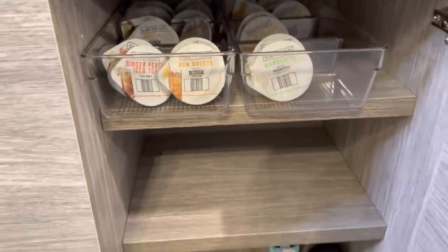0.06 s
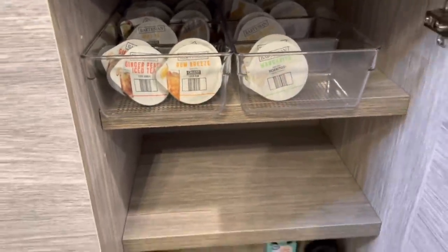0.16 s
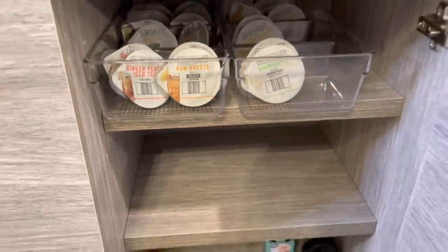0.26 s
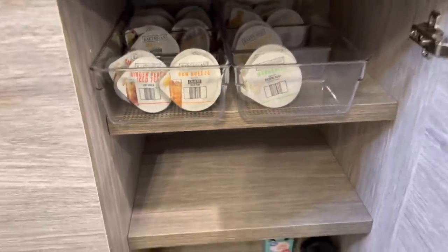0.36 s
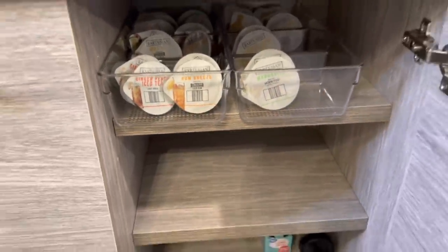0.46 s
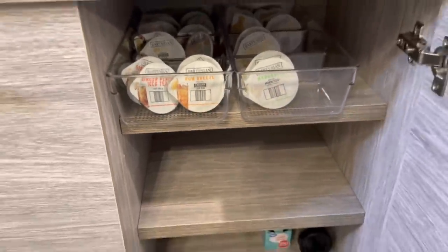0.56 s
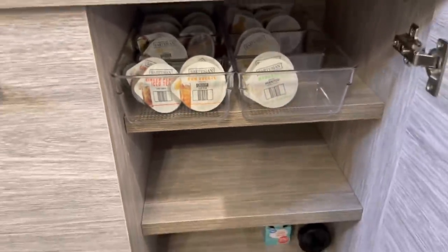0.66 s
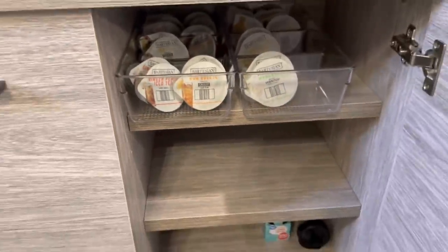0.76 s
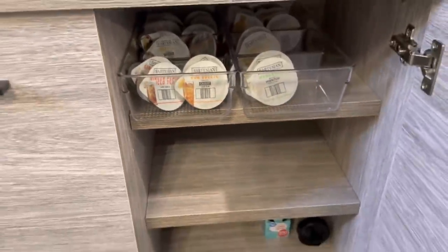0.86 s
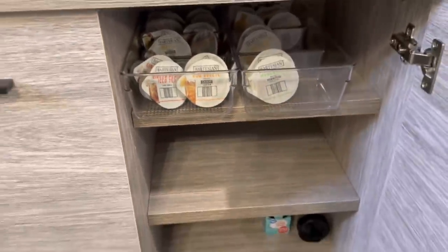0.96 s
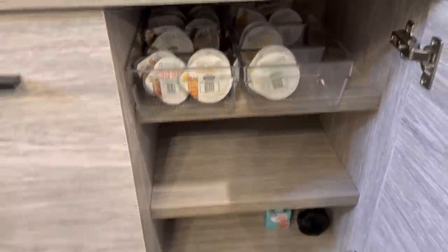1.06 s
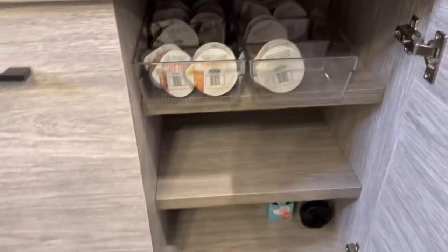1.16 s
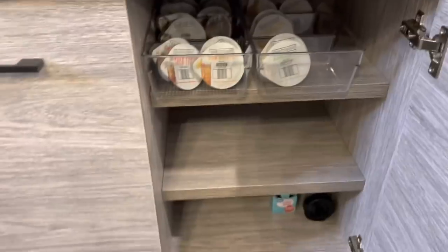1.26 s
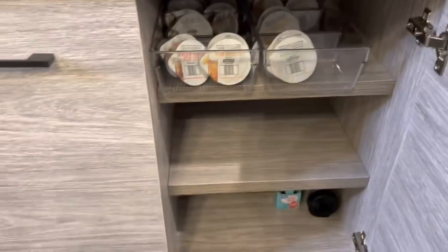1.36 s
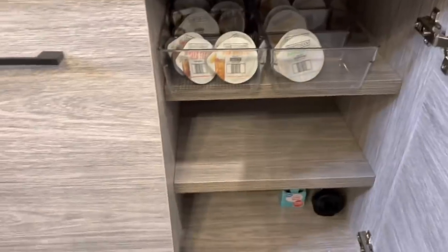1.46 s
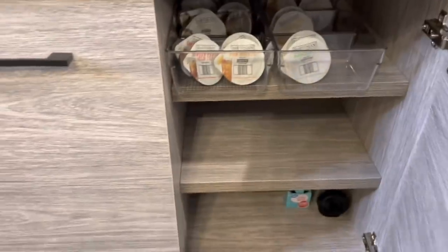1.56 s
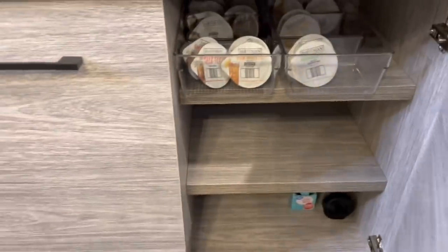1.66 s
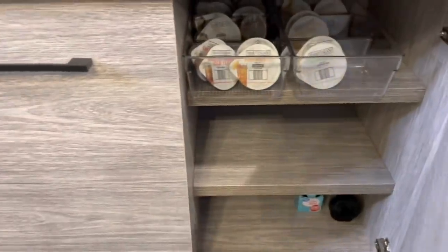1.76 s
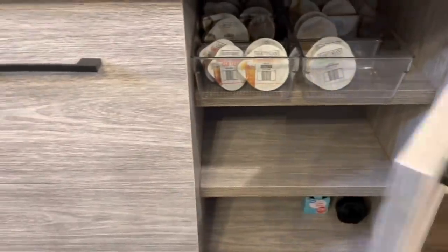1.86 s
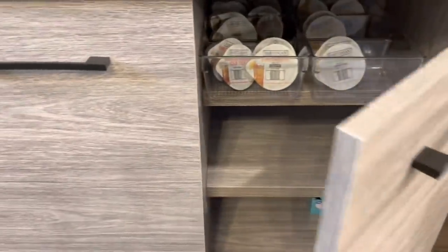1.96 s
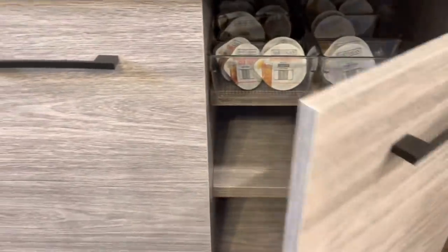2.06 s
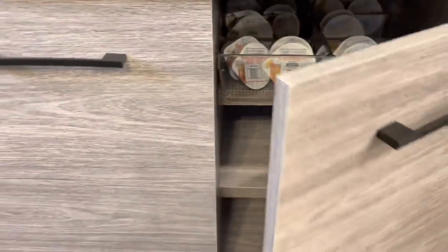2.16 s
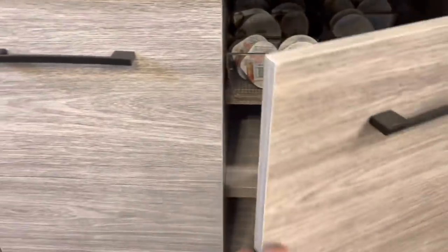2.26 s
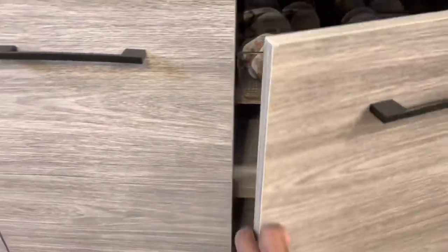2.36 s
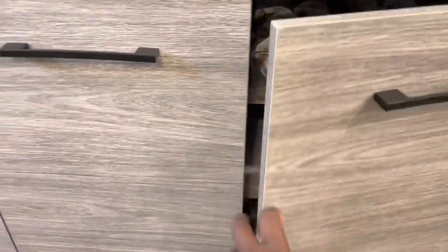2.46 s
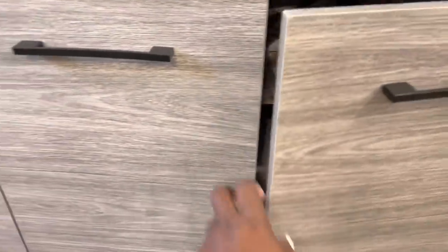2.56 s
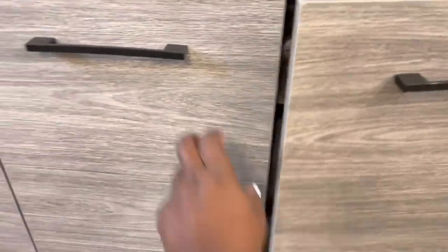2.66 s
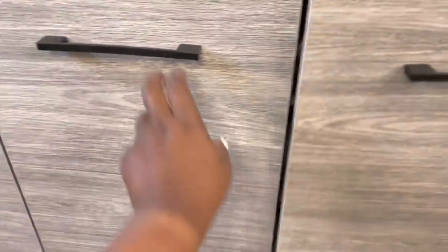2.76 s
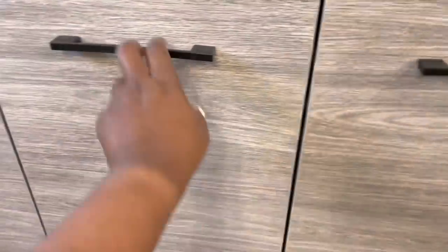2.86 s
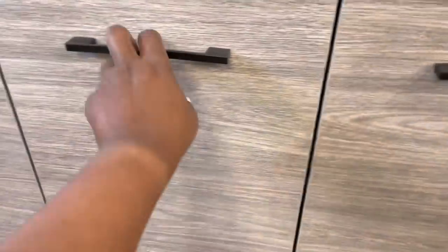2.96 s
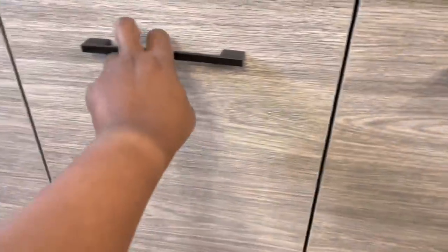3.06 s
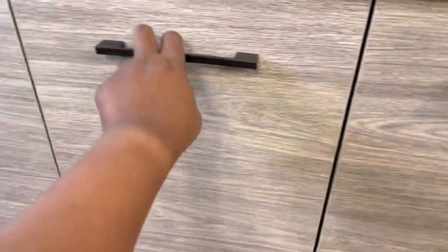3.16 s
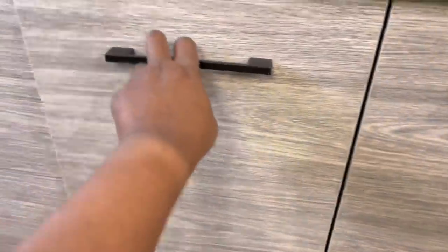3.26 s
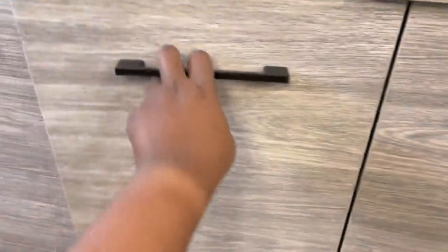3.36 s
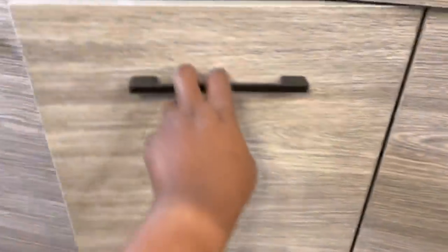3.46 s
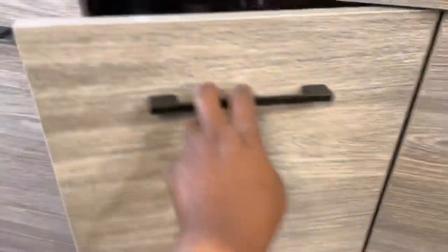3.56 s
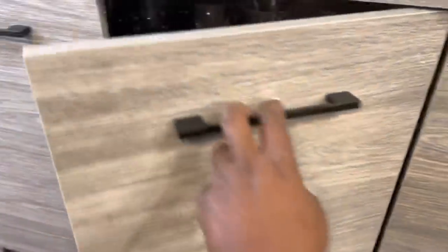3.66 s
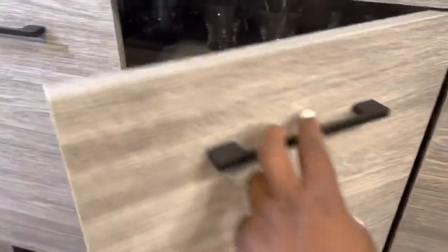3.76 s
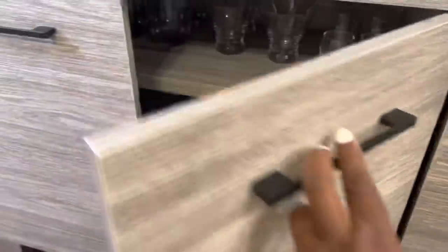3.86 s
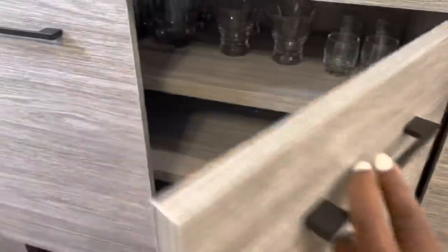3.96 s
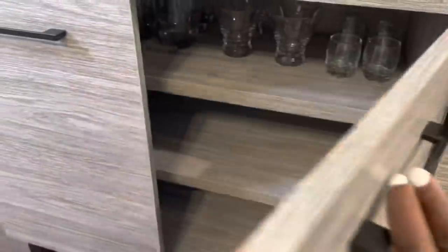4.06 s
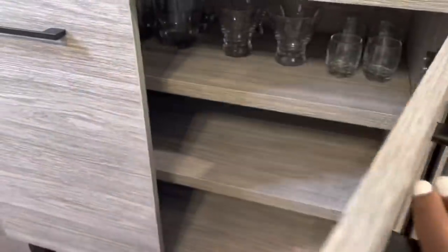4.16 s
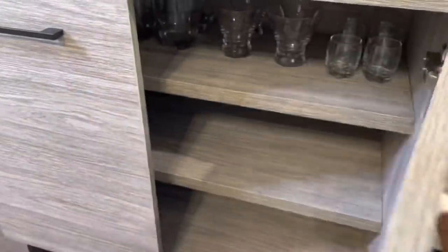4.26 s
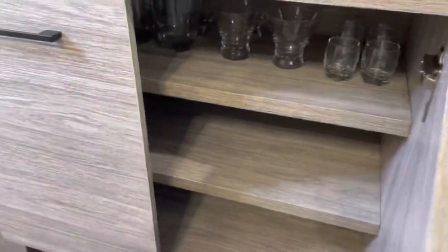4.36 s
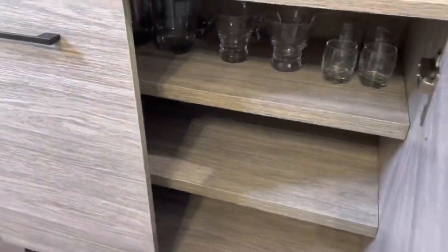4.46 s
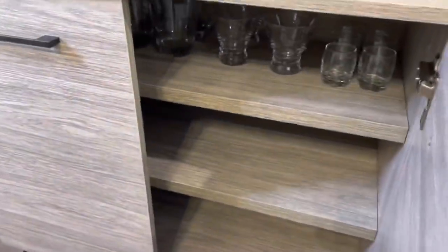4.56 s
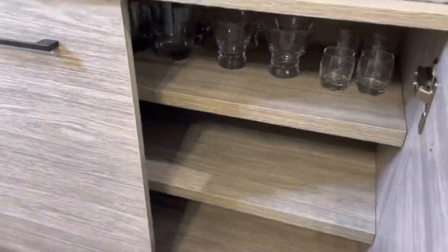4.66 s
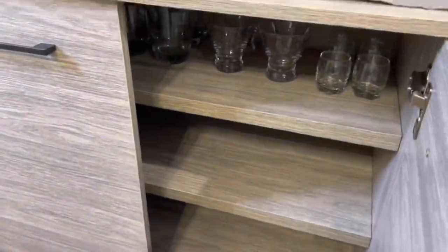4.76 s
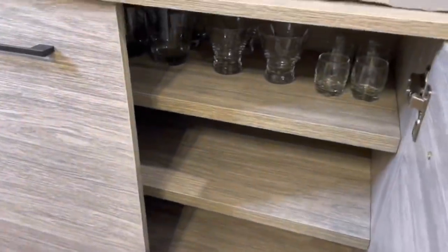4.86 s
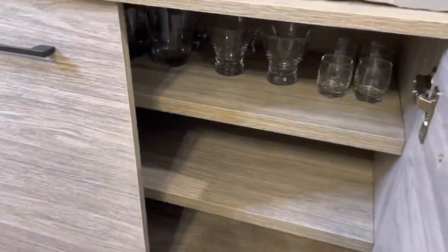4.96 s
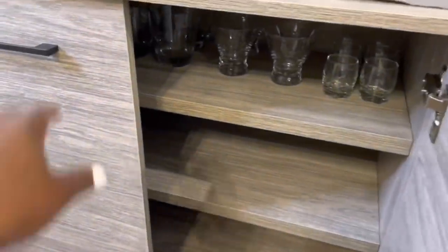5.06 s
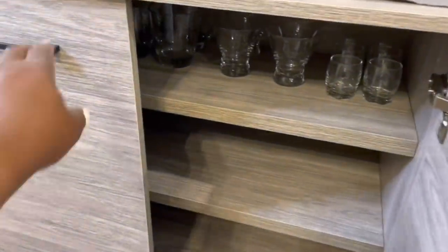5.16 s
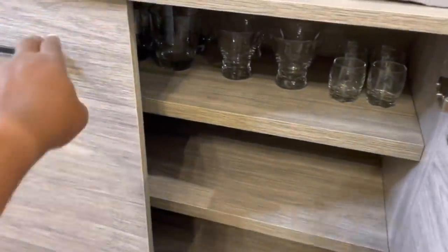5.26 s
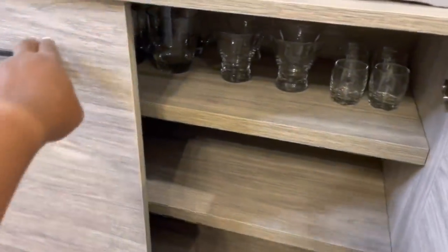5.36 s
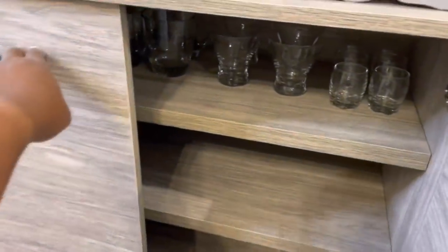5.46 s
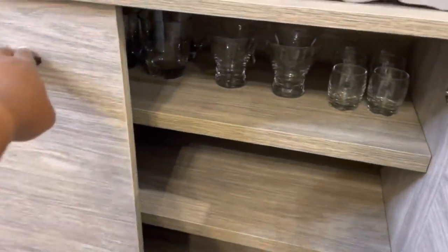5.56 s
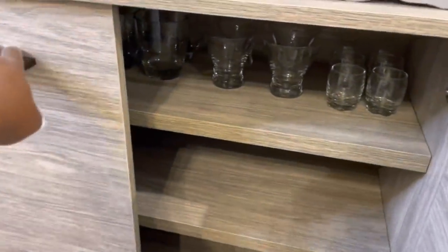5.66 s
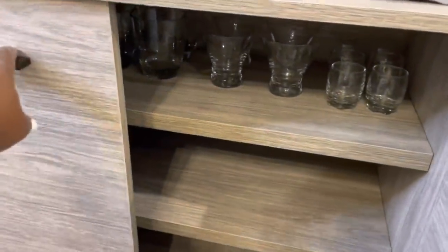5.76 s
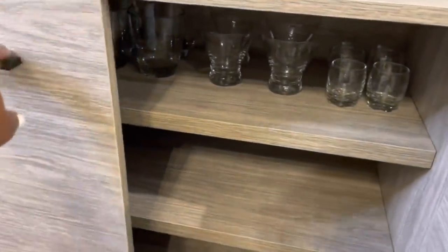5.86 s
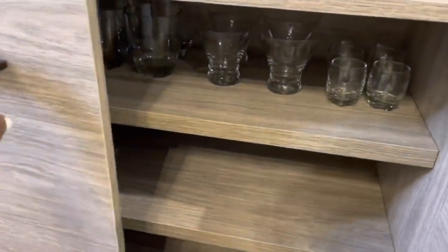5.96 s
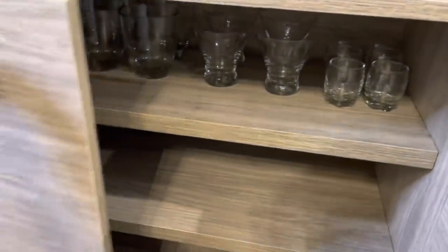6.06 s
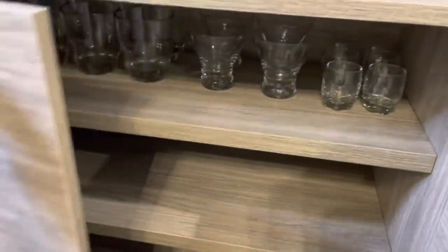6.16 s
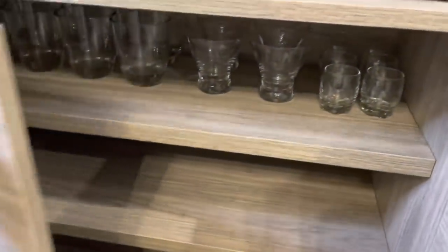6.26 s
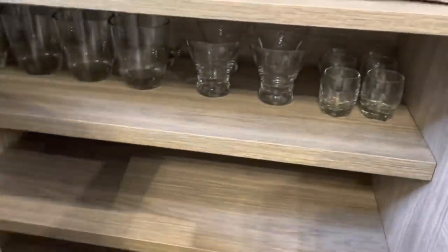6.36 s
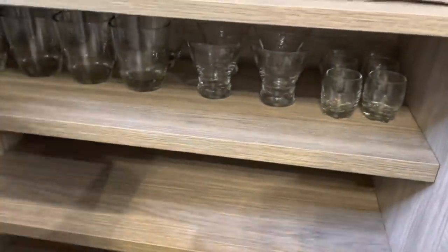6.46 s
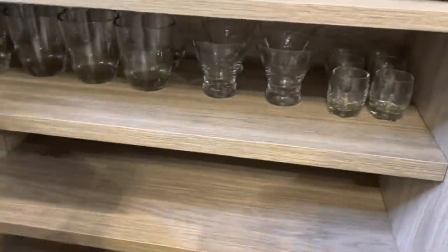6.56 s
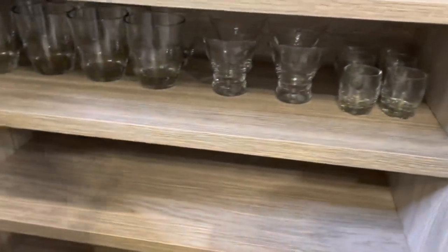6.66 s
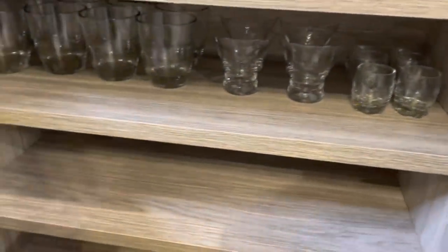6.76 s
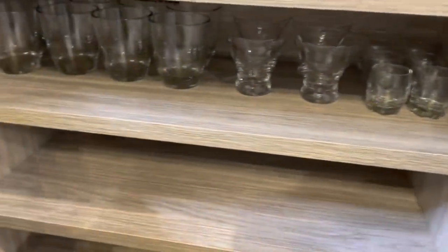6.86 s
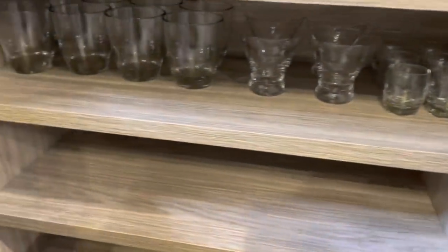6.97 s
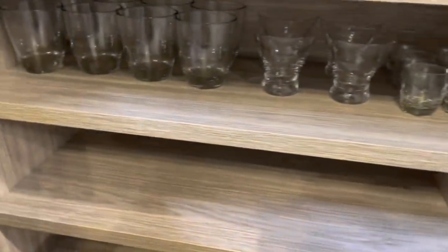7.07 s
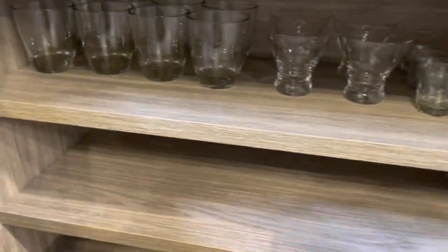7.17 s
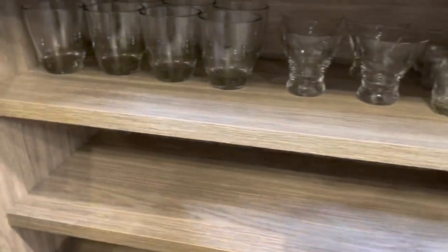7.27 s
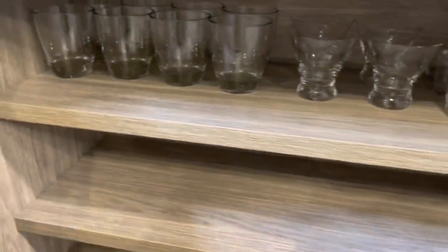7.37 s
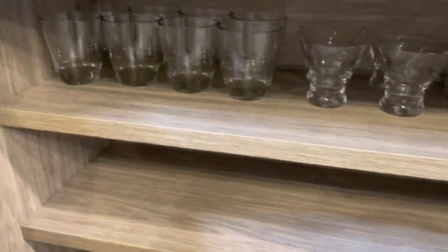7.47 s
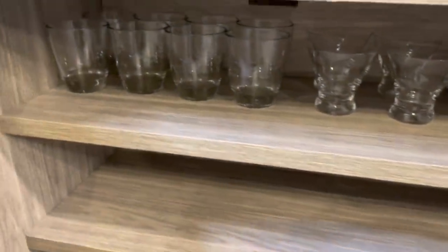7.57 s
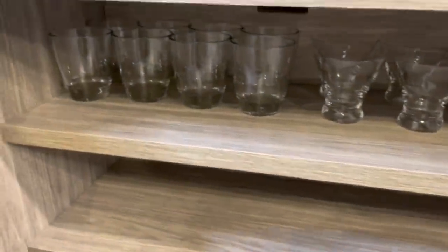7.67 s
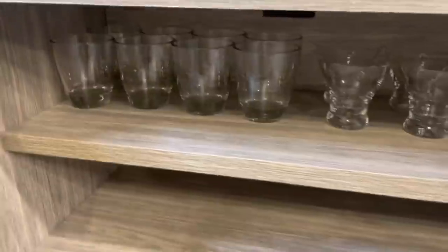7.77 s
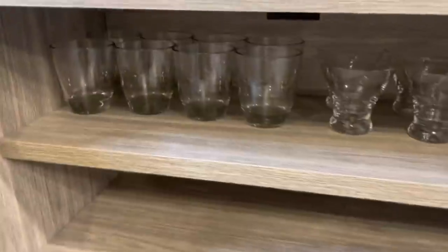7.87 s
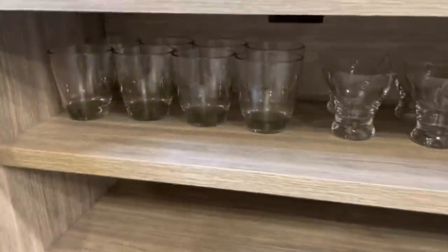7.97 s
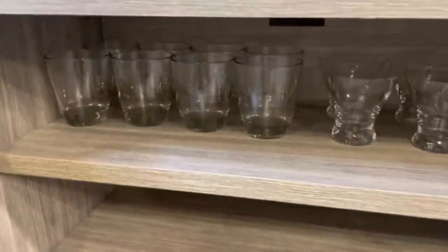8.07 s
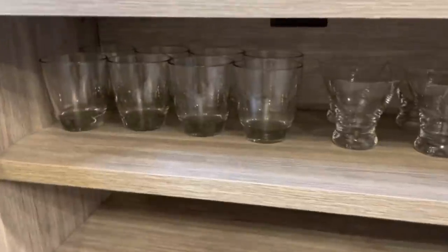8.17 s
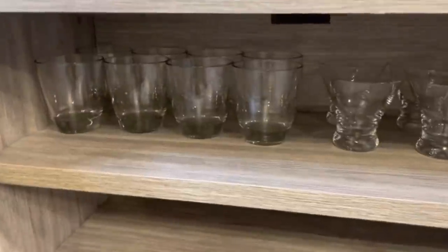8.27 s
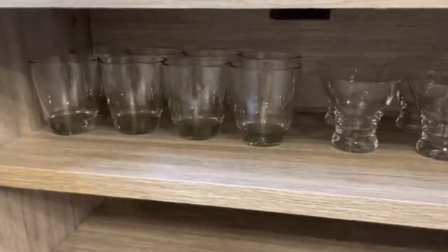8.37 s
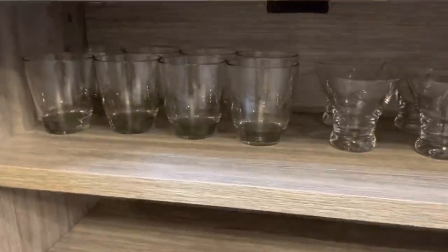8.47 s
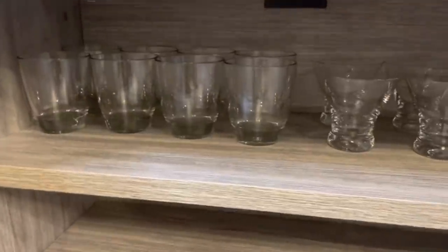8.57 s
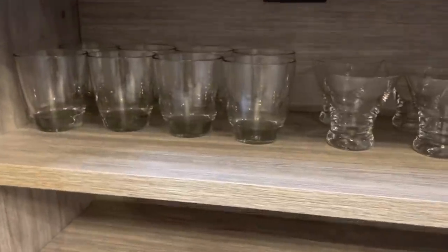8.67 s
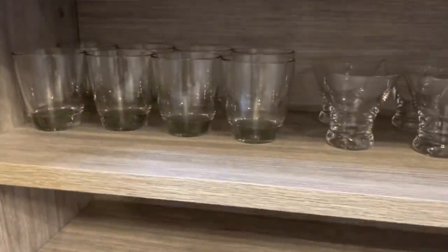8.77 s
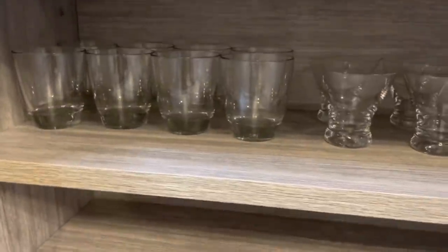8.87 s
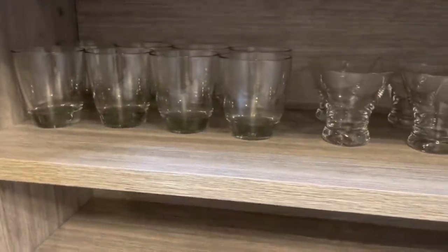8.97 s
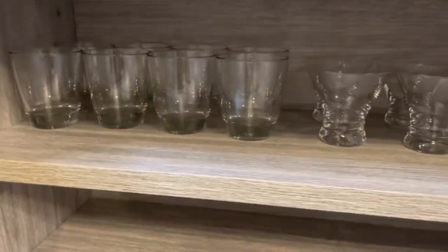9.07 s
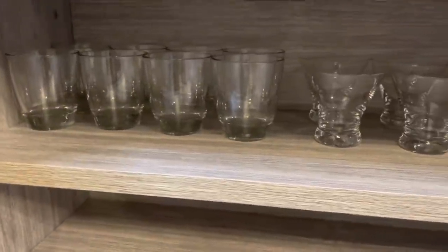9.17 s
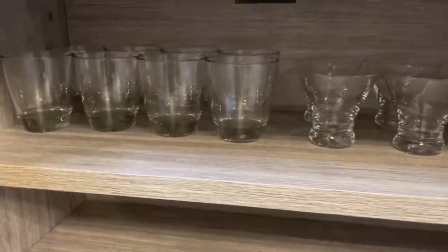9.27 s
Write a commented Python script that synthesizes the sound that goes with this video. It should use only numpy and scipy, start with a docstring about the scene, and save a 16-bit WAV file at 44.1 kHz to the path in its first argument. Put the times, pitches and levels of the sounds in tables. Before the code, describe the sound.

One loud, booming slam of a wooden cupboard door in a quiet kitchen, followed by soft handle taps, a scrape and dull thuds.

```python
"""A quiet kitchen: two appliance motors hum over the room tone, and a wooden cabinet door slams. The blow rings
its panels and carcass, the squeezed air booms inside, and the hard walls give every knock a long tail. A hand
taps handles and swings a door open with a faint squeak of hinge friction that ends in a short click. Cloth and
skin rustle; slippers scuff and thud on the floor."""
import sys
import numpy as np
from scipy import signal
from scipy.fft import rfft, irfft, next_fast_len
from scipy.io import wavfile
from scipy.ndimage import uniform_filter1d

SR = 44100
rng = np.random.default_rng(int(sys.argv[2]) if len(sys.argv) > 2 else 0)


def generate_wav(signal):
    """Clip the signal to [-1, 1] and save it as 16-bit WAV at the path in sys.argv[1]."""
    frames = np.transpose(np.atleast_2d(signal))
    scaled = np.clip(frames, -1, 1) * 32767
    pcm = np.round(scaled).astype(np.int16)
    wavfile.write(sys.argv[1], SR, pcm)


N = 410438

# stereo image of the room and of close sources: f/Hz, left-right correlation
ROOM_IMAGE = [(60, 0.96), (130, 0.91), (290, .75), (640, 0.2), (1400, -0.33), (3100, .25), (7000, -.1),
              (9000, 0.12), (11000, 0.6), (15000, .8)]
CLOSE_IMAGE = [(60, 0.98), (200, .94), (380, .8), (700, 0.099), (1300, .3), (2400, .2), (4400, 0.12),
               (8000, -.5), (10500, -0.24), (15000, .85)]
# spectrum of the room tone: f/Hz, relative level/dB
ROOM_SPECTRUM = [(20, -13.5), (32, -5.5), (70, 0), (100, -12.5), (160, -9.5), (300, -11), (500, -17.5),
                 (900, -31), (1600, -42), (2600, -50), (6500, -53), (8800, -49.5), (12000, -60),
                 (15500, -63)]
# two motors and mains buzz: f/Hz, start level/dB, end level/dB, pan/dB, waver/dB
HUM_PARTIALS = [(54.7, -66, -68, -4.5, 6.5), (112, -57, -52, 2.5, 1.5), (171, -70, -75.5, 2, -5),
                (226.15, -63.5, -70, 6.5, 3.5), (279, -68.5, -75, 6.5, -3), (335, -66, -73.5, -6.5, 2),
                (57, -59, -55, 2.5, 2.5), (117.1, -64.5, -57, -0.5, 2), (186.4, -68, -72, -1.5, 2.5),
                (347, -72, -76.5, 0.5, -5.5), (70, -59, -60.5, 2, 1), (42.6, -73, -71.5, -0.5, -0.5),
                (120, -71, -59, -0.5, 4), (117, -71.5, -69, 6, 0.5), (350, -77, -67, 5.5, 4)]
# three colours of friction (mid rub, airy sheen, low body): f/Hz, relative level/dB
RUB_SPECTRUM = [(1500, -2.5), (2600, -0.5), (3300, -4.5), (4300, -3.5), (5400, -12.5), (6500, -11),
                (7800, -15.5), (9000, -32)]
SHEEN_SPECTRUM = [(7500, -30), (9500, -4), (11500, -0.5), (14000, -2.5), (15600, -4.5)]
BODY_SPECTRUM = [(300, -19), (600, -0.5), (1100, -6.5), (1600, -13), (2200, -36)]
# narrow resonances on rub and body: f/Hz, width/Hz, boost/dB
RUB_PEAKS = [(1000, 55, 6), (1190, 100, 7.5), (1610, 50, 3.5), (1750, 50, 7), (2080, 80, 7),
             (2600, 100, 5.5), (2850, 32, 3.5), (3265, 70, 3.5), (3807, 60, 6), (4100, 22, 6.5),
             (4500, 130, 4.5), (6400, 240, 4.5)]
# a faint bed of rustle that never stops: t/s, level/dB, sheen offset/dB, body offset/dB
RUSTLE_BED = [(0, -104, 10, 9), (.45, -97.5, 2, 26), (.76, -98, 2, 21.5), (1.36, -86, -10, 11.5),
              (2.1, -89, -3, 11), (2.6, -95, -3, 15), (4.1, -90, -10, 13), (4.9, -100, 5.5, 21.5),
              (5.15, -94, 3.5, 18), (6.1, -79, -20, 10), (6.6, -87.5, -15, 10.5), (7.25, -96.5, 5, 22),
              (7.7, -102, 7, 18), (8.55, -102, 2, 14), (9.05, -100, -2, 21.5), (9.31, -100, 0, 12)]
# strokes of cloth, skin and slippers:
# t/s at full level, rise/s, hold/s, fall/s, level/dB, sheen offset/dB, body offset/dB
RUB_STROKES = [(0.185, 0.19, .05, .1, -80, 8, -23), (0.793, 0.013, 0.005, 0.056, -68, 3, 12),
               (0.894, 0.093, .01, 0.11, -63, -12, -1), (1.088, 0.16, .04, .1, -72.5, -9, 2),
               (1.174, .1, 0.019, .05, -68.5, -2, -8), (1.454, .1, 0.027, 0.18, -74.5, -4, -8),
               (1.71, .2, 0.1, .06, -81, -12, -1), (1.974, 0.22, .02, 0.093, -74.5, -15, 5.5),
               (2.36, .14, .02, .1, -71.5, -22, -8), (2.41, .1, .04, .1, -72.5, -3, -6),
               (2.5, 0.077, .02, 0.063, -77, -18, 20), (2.635, .03, .01, .05, -78.5, -17, 15),
               (2.726, 0.12, .02, .12, -70.5, -17, 8), (2.803, .04, .05, .1, -65.5, -16, 8),
               (3.62, 0.51, .38, .2, -79, -9, 0.5), (4.233, .15, .15, 0.18, -74, -1, -6),
               (4.5, 0.061, .01, .06, -75.5, 5, -8), (4.57, .15, 0.086, .2, -74.5, -22, 6),
               (5.117, 0.064, 0.33, .15, -81.5, -8, 14), (5.258, 0.2, .03, .3, -72, -1.5, 0),
               (5.47, .1, .05, 0.13, -68.5, -4, -2), (5.537, 0.02, .005, 0.057, -54, -10.5, -9),
               (5.67, .015, 0.017, 0.035, -62.5, -35, 5), (5.857, 0.14, 0.087, .11, -43, -16.5, -2.5),
               (6.231, .035, 0.0046, .065, -61.5, -29, -3.5), (6.329, 0.14, 0.047, 0.11, -69.5, -4.5, -4),
               (6.521, .15, .03, 0.055, -76, -24.5, 4), (6.928, 0.071, .01, .4, -77.5, -17, 3),
               (7.62, .02, .01, .05, -78, -15, -8), (8.051, 0.17, 0.24, 0.3, -80, 1, 3),
               (9.245, 0.083, .06, .1, -69.5, -5, -5)]
# scrapes on one resonance of the rubbed surface: start/s, end/s, level/dB, f/Hz, width/Hz
SCRAPES = [(0.134, .29, -78.5, 4220, 1400), (0.135, 0.288, -71.5, 8100, 2000),
           (.50, .76, -76.5, 1130, 80.8), (.79, .84, -72, 1130, 150), (0.841, .95, -75, 3960, 150),
           (0.859, 0.997, -74, 1270, 150), (1.041, 1.125, -81, 3800, 120), (1.04, 1.2, -84, 4830, 200),
           (1.576, 1.747, -85, 2080, 90), (1.63, 1.82, -82, 2620, 120), (2.33, 2.40, -77, 2600, 150),
           (2.318, 2.398, -80, 3920, 200), (2.518, 2.80, -76, 1160, 150), (2.66, 2.80, -85, 4100, 200),
           (3.696, 3.904, -81, 2600, 120), (5.081, 5.45, -70.5, 1050, 200), (5.43, 5.53, -73.5, 4700, 400),
           (5.859, 5.963, -48, 470, 80), (5.76, 6.002, -45.5, 430, 300), (5.772, 5.918, -53, 2790, 300),
           (6.22, 6.271, -75.5, 4500, 500), (6.277, 6.45, -79, 4500, 450)]
# metal resonances of the hinge: f/Hz, width/Hz, relative level/dB
HINGE_MODES = [(2440, 106, 0), (3350, 110, -6.5), (3860, 255, -15), (4880, 250, -16), (6000, 173, -18),
               (7640, 250, -11.5), (9540, 250, -4.5), (11720, 193, -5.5), (14000, 300, -20)]
# squeaks of the swinging door: t/s at full level, rise/s, hold/s, fall/s, level/dB
SQUEAKS = [(4.25, .12, 0.098, 0.32, -72.5), (4.504, .05, .01, .04, -72.5)]
# short dull pops: t/s, level/dB, f/Hz, t60/s
POPS = [(.799, -47, 1090, 0.051), (.935, -53, 640, 0.047), (1.037, -50, 400, .04), (1.222, -52, 600, .04),
        (1.956, -49, 644, 0.029), (2.514, -54, 900, .05), (4.307, -49, 597, 0.039),
        (4.622, -53, 550, 0.041), (5.536, -43, 524, 0.17), (5.964, -31, 295, 0.13),
        (5.972, -34, 526, 0.099), (6.000, -40, 460, .12), (6.100, -39, 301, 0.13), (6.551, -40.5, 554, .06),
        (8.722, -57, 600, 0.031)]
# low modes of the floor: f/Hz, relative level/dB, t60/s
FLOOR_MODES = [(61, -10.5, 0.24), (84, -1.5, 0.25), (126, 1.5, .14), (167, -7.5, .15), (235, -1, .15),
               (344, -2, .2), (460, 1, 0.22)]
# soft thuds of feet and door edges: t/s, level/dB, contact/ms
THUDS = [(2.536, -42, 7.4), (2.642, -39, 9.3), (5.539, -42, 5), (5.595, -32, 4.6), (5.677, -26, 8.9),
         (5.697, -29.5, 8.2), (5.741, -35.5, 3.9), (5.958, -29, 3.1), (5.967, -17, 5.34), (6.009, -30.5, 5),
         (6.100, -44, 4.2), (6.581, -43, 5.2), (7.496, -40.5, 6.4)]
# three close modes of the air in the cabinet: f/Hz, level/dB, t60/s
AIR_MODES = [(67.7, -11.4, .58), (72.4, -10.7, .37), (76.6, -5.3, .46)]
# dense ring of the panels and its room tail: f/Hz, level/dB, panel t60/s, room send/dB, room t60/s
RING_BANDS = [(200, -7.5, 0.2, -12.5, 1), (400, -1, 0.21, -10, 1), (802, -3.5, 0.14, -10, 0.74),
              (1180, -5, 0.17, -9, 1), (1800, -9, 0.39, -8, 1), (2600, -7.5, 0.14, -10, .75),
              (3800, -11, .14, -11, 0.73), (5505, -17, .14, -9.5, 0.47), (7200, -16, 0.14, -12.5, 0.55),
              (9000, -22.5, 0.092, -14, 0.33), (11500, -13, 0.14, -13.5, 0.32), (14500, -19, .08, -14, .4)]
# wooden modes of door and carcass: f/Hz, relative level/dB, t60/s, pan/dB
CARCASS_MODES = [(117, -4, 0.33, 3), (150, -5, 0.67, 2), (168.3, 0, 0.22, 2), (182.9, -7, 0.38, 2),
                 (199.4, -9.5, 0.48, 0.5), (231.1, -0.5, 0.31, 1), (272, 1, .35, 1.5),
                 (340, -5.5, .2, -0.5), (364, -5.5, 0.23, 1), (391, -6, .35, 4), (475, -4.5, 0.33, -3),
                 (541.3, -2.5, 0.54, 3), (638, -11, 0.24, 0.5), (1015, -14.5, 0.28, 1.5),
                 (1063.5, -9, .35, -2.5), (1365, -14.5, 0.19, 2), (1652, -7.5, 0.18, -1),
                 (1927, -10.5, 0.36, 1), (2455, -9.5, .25, 0.5)]
# blows on doors, handles and catches:
# t/s, panel level/dB, hardness/Hz, carcass level/dB, panel pan/dB, panel t60 factor
KNOCKS = [(0.791, -56.5, 8000, -74, 0, 0.6), (0.801, -65, 1500, -62, 8, .5),
          (2.440, -60, 1800, -64, 5, 0.98), (2.513, -57.5, 1450, -54, -1, 0.59),
          (2.634, -65.5, 2500, -62.5, -3, .4), (2.815, -38, 9000, -44.5, 1.5, 1),
          (2.8334, -16.5, 5050, -17, 0.5, 1), (2.842, -16, 2950, -21.5, 0, 0.7),
          (2.851, -31.5, 2518, -26.5, 14, 0.82), (2.862, -40, 1985, -22, 0, .9),
          (3.120, -57, 8000, -77, 1, 0.16), (4.869, -74, 8000, -85.5, 0, 0.27),
          (5.270, -69, 9000, -87.5, -7, .2), (5.533, -50.5, 4000, -56.5, 2, 0.55),
          (5.594, -52.5, 696, -49, 5, .5), (5.667, -52, 2530, -57, 2, 0.7),
          (5.686, -47.5, 350, -46, 4, 0.36), (5.963, -39.5, 400, -40, 4.5, 1),
          (5.975, -36, 400, -36, -0.5, 1), (6.223, -55, 4000, -68.5, 1.5, 0.45),
          (6.245, -66, 5000, -63, 1.5, .4), (6.551, -51.5, 698, -59.5, 1.5, .5),
          (6.930, -73.5, 2470, -85, -1, .4), (7.320, -76.5, 2500, -85, 0, 0.28),
          (7.420, -78.5, 2500, -86, 0, .3), (7.625, -77.5, 2000, -87, 0, .4)]
# a dip in the treble around 8-9.5 kHz: f/Hz, gain/dB
TREBLE_DIP = [(20, 0), (7000, 0), (8200, -7.5), (9300, -9), (10500, -3), (20000, 0)]


def amp(db):
    return 10 ** (np.asarray(db) / 20)


def unit_rms(x):
    return x / np.sqrt(np.mean(x ** 2) + 1e-20)


def curve_at(points, hz):
    """Read a breakpoint curve on a log frequency axis."""
    f, value = np.transpose(points)
    return np.interp(np.log(hz + 1), np.log(f + 1), value)


def add(mix, start_s, sound):
    part = mix[:, round(start_s * SR):][:, :sound.shape[-1]]
    part += sound[..., :part.shape[-1]]


def pan(db):
    """Channel gains that put the left db above the right."""
    return amp(np.array([[db], [-db]]) / 2)


def resonance(hz, centre_hz, width_hz):
    """A bell curve, width_hz wide at half height."""
    return 1 / (1 + (2 * (hz - centre_hz) / width_hz) ** 2)


def drift(fastest_hz):
    """Slow random modulation of rms 1."""
    t = np.arange(0, N + 256, 256) / SR
    rates = np.geomspace(.15, fastest_hz, 16)
    wander = sum(np.sin(2 * np.pi * (f * t + rng.random())) / np.sqrt(f) for f in rates)
    return np.interp(np.arange(N) / SR, t, unit_rms(wander))


def swell(t, full_s, rise_s, hold_s, fall_s):
    """An envelope that climbs 20 dB per rise_s, holds, then sinks 20 dB per fall_s."""
    before = np.maximum(full_s - t, 0)
    after = np.maximum(t - full_s - hold_s, 0)
    return amp(-20 * (before / rise_s + after / fall_s))


def stereo_spectra(image, size):
    """Left and right white-noise spectra, as alike at each frequency as the image says."""
    hz = np.fft.rfftfreq(size, 1 / SR)
    shared, apart = rfft(rng.standard_normal((2, size)))
    alike = curve_at(image, hz)
    return hz, np.array([shared, alike * shared + np.sqrt(1 - alike ** 2) * apart])


def noise(spectrum, image, peaks=()):
    """Steady stereo noise of rms 1, with narrow peaks raised on its spectrum."""
    size = next_fast_len(N)
    hz, white = stereo_spectra(image, size)
    boost_db = sum(db * resonance(hz, f, width) for f, width, db in peaks)
    return unit_rms(irfft(white * amp(curve_at(spectrum, hz) + boost_db), size)[:, :N])


def dying_bands(image, levels_db, t60s, size):
    """Noise above 120 Hz whose bands each die at their own speed."""
    hz, white = stereo_spectra(image, size)
    t, out = np.arange(size) / SR, np.zeros((2, size))
    log_centres = np.log([row[0] for row in RING_BANDS])
    for solo, db, t60 in zip(np.eye(len(RING_BANDS)), levels_db, t60s):
        band = np.interp(np.log(hz + 1), log_centres, solo) * (hz > 120)
        out += irfft(white * band, size) * amp(db - 60 * t / t60)
    return out / np.sqrt(2)


def dying_sines(modes, t):
    """One dying sine per mode; neighbours start with opposite signs."""
    return [(-1) ** k * amp(db - 60 * t / t60) * np.sin(2 * np.pi * hz * t)
            for k, (hz, db, t60, *_) in enumerate(modes)]


def room_tone():
    """A bed of distant air and machines, swelling a little."""
    level_db = -56.5 + 1.7 * drift(fastest_hz=3)
    return amp(level_db) * noise(ROOM_SPECTRUM, ROOM_IMAGE)


def motor_hum():
    """Motors and mains drone at fixed pitches; each partial wavers in level."""
    t, out = np.arange(N) / SR, np.zeros((2, N))
    for hz, start_db, end_db, pan_db, waver_db in HUM_PARTIALS:
        level_db = start_db + (end_db - start_db) * t / t[-1] + waver_db * drift(fastest_hz=1.1)
        out += pan(pan_db) * amp(level_db) * np.sqrt(2) * np.sin(2 * np.pi * (hz * t + rng.random()))
    return out


def catch_and_slip(smooth):
    """Fibres catch and slip, making friction noise patchy in time and pitch."""
    spectrogram = signal.stft(smooth, nperseg=512, noverlap=256)[2]
    patches = rng.standard_normal((spectrogram.shape[2], spectrogram.shape[1]))
    patches = uniform_filter1d(patches, size=10, axis=0)  # smear in time
    patches = uniform_filter1d(patches, size=3, axis=1)  # smear in pitch
    gain_db = 3 * unit_rms(patches).T - 2.03
    return signal.istft(spectrogram * amp(gain_db), nperseg=512, noverlap=256)[1][:, :N]


def rubbing():
    """Cloth, skin and slippers: strokes of fine friction noise ride on a faint rustle."""
    t = np.arange(0, N + 64, 64) / SR
    times, bed_db, bed_sheen_db, bed_body_db = np.transpose(RUSTLE_BED)
    power = amp([np.interp(t, times, bed_db + offset) for offset in (0, bed_sheen_db, bed_body_db)]) ** 2
    for *timing, db, sheen_db, body_db in RUB_STROKES:
        power += (amp([[db], [db + sheen_db], [db + body_db]]) * swell(t, *timing)) ** 2
    rub_gain, sheen_gain, body_gain = (np.interp(np.arange(N) / SR, t, np.sqrt(p)) for p in power)
    rub = rub_gain * noise(RUB_SPECTRUM, CLOSE_IMAGE, RUB_PEAKS)
    sheen = sheen_gain * noise(SHEEN_SPECTRUM, CLOSE_IMAGE)
    body = body_gain * noise(BODY_SPECTRUM, CLOSE_IMAGE, RUB_PEAKS)
    return catch_and_slip(rub + sheen + body)


def scrapes():
    """A rubbed surface rings on one resonance: a band of noise that fades in and out."""
    out = np.zeros((2, N))
    for start_s, end_s, db, centre_hz, width_hz in SCRAPES:
        size = round((end_s - start_s) * SR)
        hz, white = stereo_spectra(CLOSE_IMAGE, size)
        band = irfft(white * resonance(hz, centre_hz, width_hz), size)
        add(out, start_s, amp(db) * unit_rms(band) * signal.windows.tukey(size, .7))
    return out


def hinge_squeak():
    """Friction in the pivot excites its narrow metal resonances as the door swings."""
    size = next_fast_len(N)
    hz, white = stereo_spectra(CLOSE_IMAGE, size)
    metal = sum(amp(db) * resonance(hz, f, width) for f, width, db in HINGE_MODES)
    envelope = sum(amp(db) * swell(np.arange(N) / SR, *timing) for *timing, db in SQUEAKS)
    return envelope * unit_rms(irfft(white * metal, size))[:, :N]


def pops():
    """Each pop is one dull, fast-dying note with a rounded attack."""
    t, out = np.arange(6000) / SR, np.zeros((2, N))
    attack = 1 - np.exp(-t / .0018)
    for start_s, db, hz, t60 in POPS:
        add(out, start_s, pan(1.6) * amp(db - 60 * t / t60) * attack * np.sin(2 * np.pi * hz * t))
    return out


def thuds():
    """Feet and door edges land softly: a slow push rings only the floor's low modes."""
    out = np.zeros((2, N))
    floor = sum(dying_sines(FLOOR_MODES, np.arange(12000) / SR))
    for start_s, db, contact_ms in THUDS:
        push = np.hanning(round(contact_ms * SR / 1000))
        thud = signal.oaconvolve(floor, push)
        add(out, start_s, pan(1.2) * amp(db) * thud / abs(thud).max())
    return out


def cabinet_boom(start_s=2.854, rise_s=.028):
    """The slam's low end: the door squeezes the air inside, whose modes build, then beat as they die."""
    t, out = np.arange(30000) / SR, np.zeros((2, N))
    air = sum(amp(db - 60 * t / t60) * np.sin(2 * np.pi * hz * t) for hz, db, t60 in AIR_MODES)
    attack = 1 - np.exp(-t / rise_s)
    add(out, start_s, -pan(.4) * air * attack)
    return out


def panel_ring(hardness_hz, t60_factor, size):
    """Many close modes, heard as noise: they die fast in the panel and slowly in the room."""
    _, db, panel_t60, send_db, room_t60 = np.transpose(RING_BANDS)
    t = np.arange(size) / SR
    build_up = 1 - np.exp(-t / .0092)  # reflections take time to arrive
    ring = build_up * dying_bands(ROOM_IMAGE, db + send_db, room_t60, size)
    crack = 1 + amp(.5 - 60 * t[:6000] / .012)  # extra bite in the first milliseconds
    add(ring, 0, crack * dying_bands(CLOSE_IMAGE, db, t60_factor * panel_t60, len(crack)))
    # a softer contact has a slower attack and less treble
    attack = 1 - np.exp(-(t * hardness_hz) ** 2)
    lowpass = signal.butter(2, hardness_hz, fs=SR)
    ring = signal.lfilter(*lowpass, ring * attack)
    onset_rms = np.sqrt(np.mean(ring[:, :400] ** 2))
    push = np.gradient(np.exp(-(2.5 * t * hardness_hz - 2) ** 2))  # direct pulse of the contact
    return ring / onset_rms - 1.9 * push / abs(push).max()


def knocks():
    """From handle taps to the slam, each blow rings panels and carcass: the harder, the brighter."""
    t, out = np.arange(30000) / SR, np.zeros((2, N))
    waves = dying_sines(CARCASS_MODES, t)
    attack = 1 - np.exp(-t / .0015)
    for start_s, panel_db, hardness_hz, carcass_db, pan_db, t60_factor in KNOCKS:
        size = 40000 if panel_db > -30 else 12000  # loud blows keep their long tail
        add(out, start_s, pan(pan_db) * amp(panel_db) * panel_ring(hardness_hz, t60_factor, size))
        carcass = sum(pan(mode_pan_db) * wave / (1 + (hz / hardness_hz) ** 2)
                      for (hz, _, _, mode_pan_db), wave in zip(CARCASS_MODES, waves))
        add(out, start_s, amp(carcass_db) * carcass * attack)
    return out


def scene():
    background = room_tone() + motor_hum()
    friction = rubbing() + scrapes() + hinge_squeak()
    impacts = knocks() + cabinet_boom() + thuds() + pops()
    return background + friction + impacts


def record(dry):
    """The treble is scooped near 9 kHz; a steep high cut takes off the very top."""
    hz = np.linspace(0, SR / 2, 200)
    scoop = signal.firwin2(255, hz, amp(curve_at(TREBLE_DIP, hz)), fs=SR)
    high_cut = signal.firwin(511, cutoff=15750, window=("kaiser", 9), fs=SR)
    return signal.oaconvolve(dry, np.convolve(scoop, high_cut)[None], "same")


dry = scene()
out = record(dry)
generate_wav(out)
```